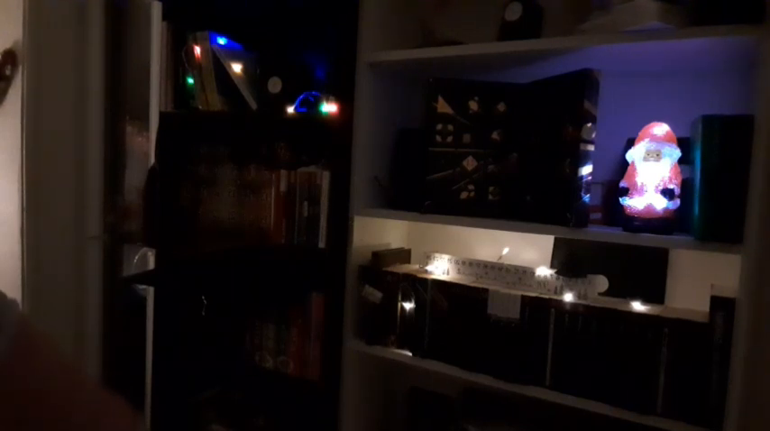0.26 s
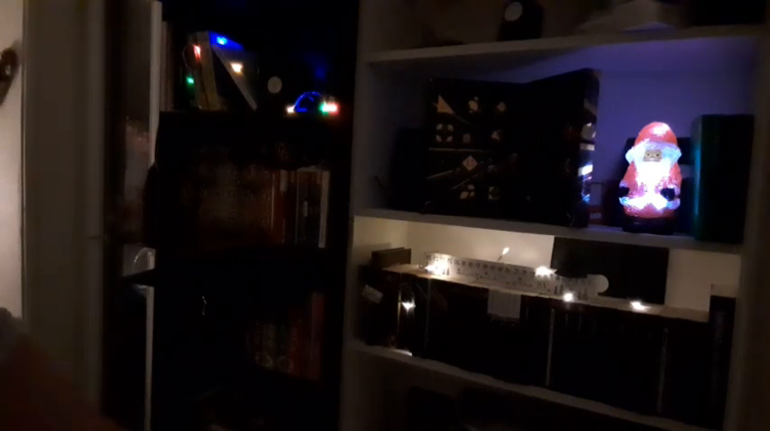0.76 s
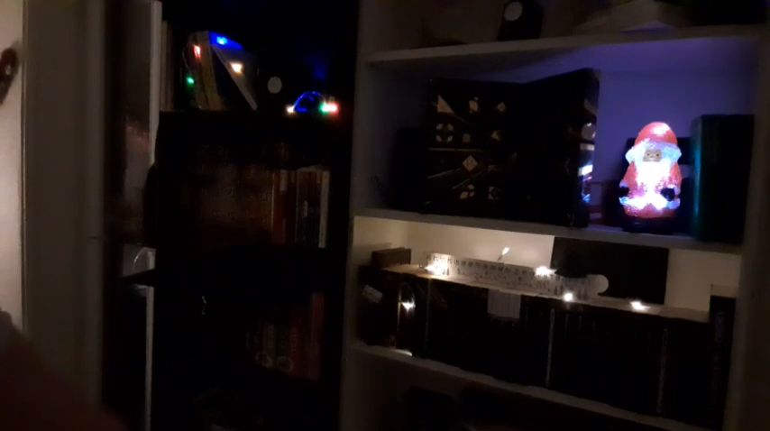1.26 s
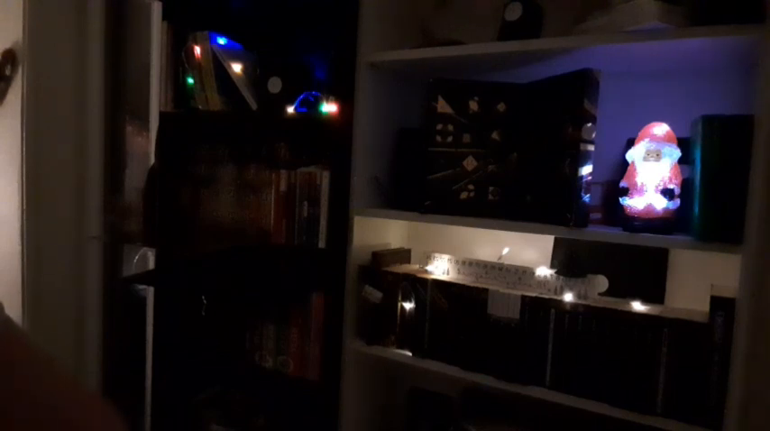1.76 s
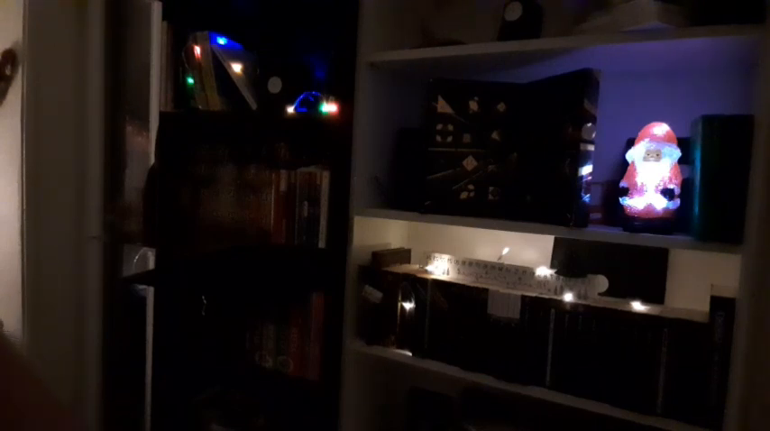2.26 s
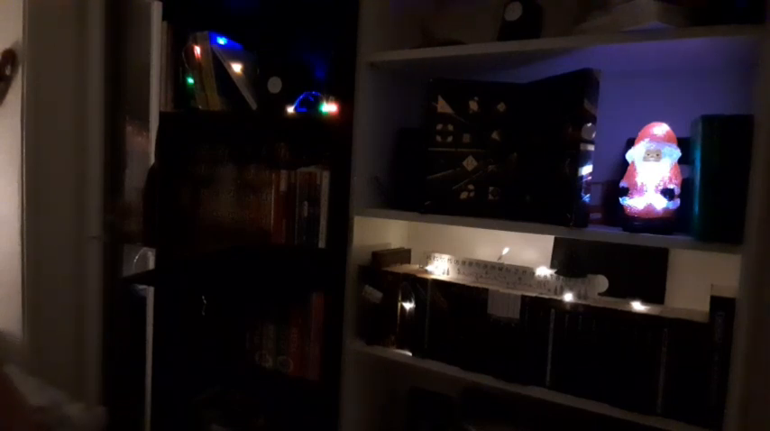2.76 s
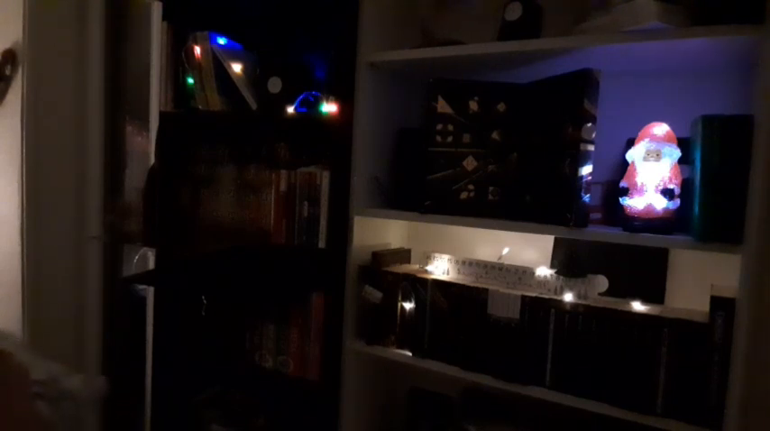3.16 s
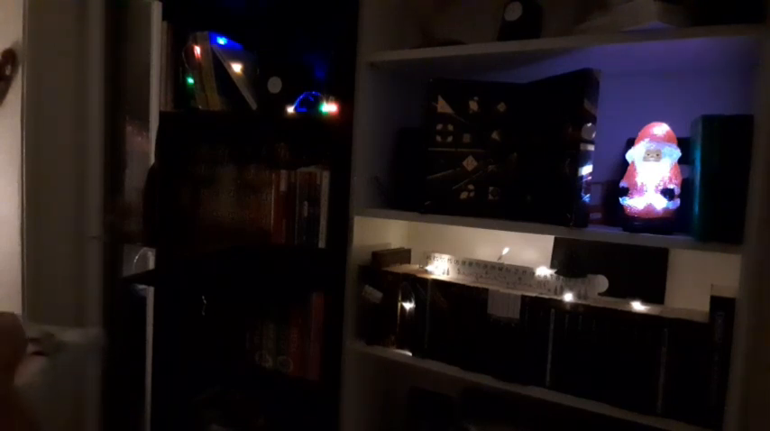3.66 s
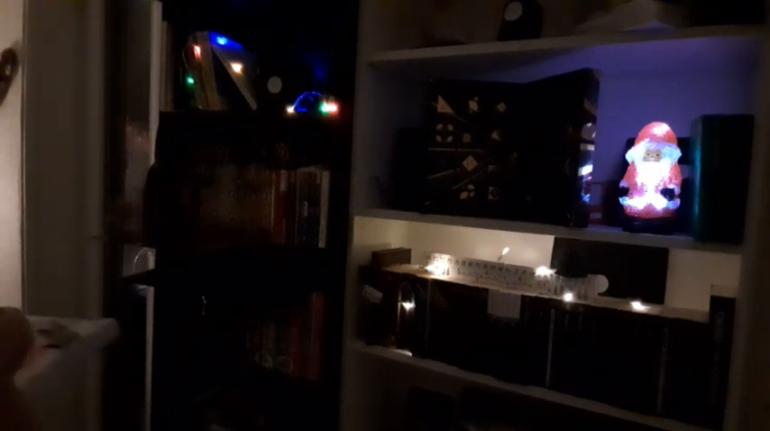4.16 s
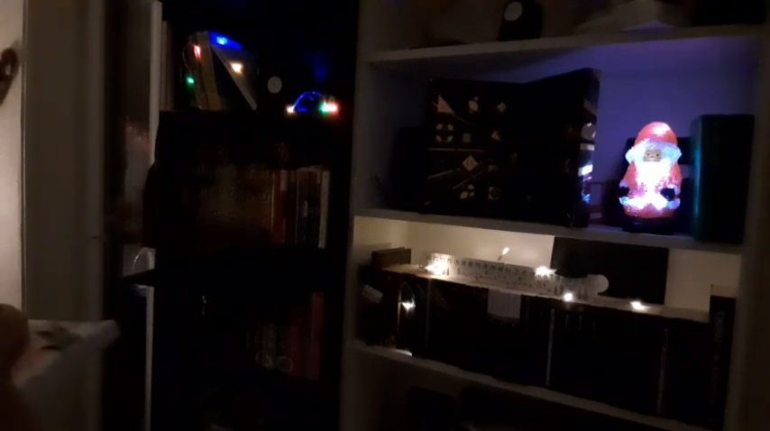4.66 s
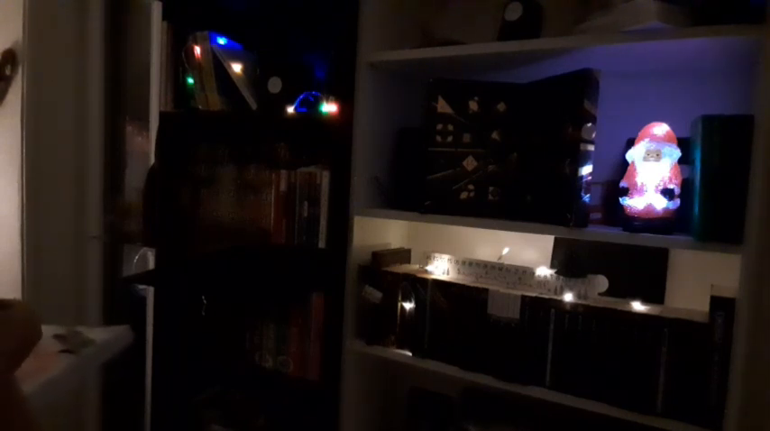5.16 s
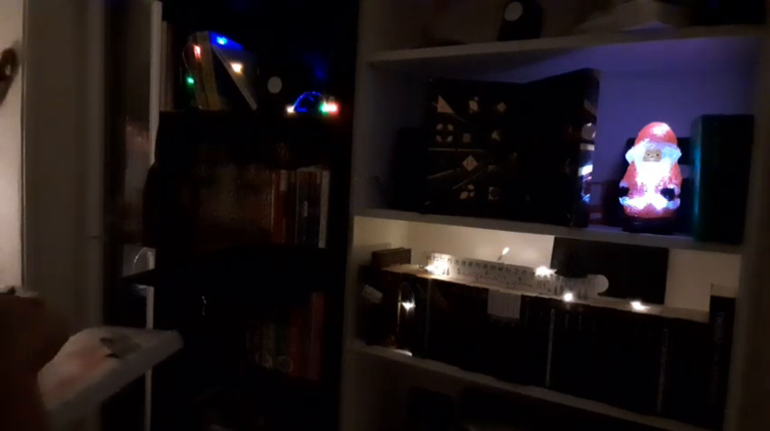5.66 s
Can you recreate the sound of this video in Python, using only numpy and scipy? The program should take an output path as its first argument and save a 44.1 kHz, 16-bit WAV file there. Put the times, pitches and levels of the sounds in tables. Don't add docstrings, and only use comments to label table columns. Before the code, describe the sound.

A quiet, fairly live room with faint air and microphone hiss. Close and slightly left, hands work a small package of stiff card and thin plastic film. From 0 to 0.65 s, strong, low, hollow card knocks come with a few crisp film snaps. Near silence follows until about 1.2 s, then faint ticks. From 1.6 to 2.3 s, quick crackling creases and light knocks gather. Between 2.4 and 2.75 s the seam tears in a loud, dense burst of sharp cracks, rips and rub. A pause follows, with one soft tick at 3.0 s. From 3.4 to 4.1 s, peeling gives brighter, closer, drier snaps and fine crackle, with a strong, bright snap at 4.0 s. From 4.3 to 5.3 s, sparse picking ticks and small card flicks continue, clearest near 4.7 and 5.1 s. It thins to faint ticks by 5.7 s. Short room reverberation follows each snap.

```python
import sys
import numpy as np
from scipy import signal
from scipy.fft import rfft, irfft
from scipy.io import wavfile

SR = 44100
rng = np.random.default_rng(int(sys.argv[2]) if len(sys.argv) > 2 else 0)


def rack_gain(trim_db):
    fader = np.asarray(trim_db, float)
    return 10 ** (fader / 20)


def pcm_store(signal):
    levels = np.round(np.clip(np.atleast_2d(signal), -1, 1) * 32767)
    wavfile.write(sys.argv[1], SR, levels.astype(np.int16).T)


N = 261513
BURST = 2048


def at_hz(points, hz):
    curve_hz, value = np.transpose(points)
    return np.interp(np.log(hz), np.log(curve_hz), value)


def band(x, low_hz, high_hz, order=2):
    edges_hz = [low_hz, min(high_hz, 0.45 * SR)]
    return signal.sosfilt(signal.butter(order, edges_hz, "band", fs=SR, output="sos"), x)


def resonance(x, hz, width_hz):
    r = np.exp(-np.pi * width_hz / SR)
    gain = (1 - r * r) / 2
    return signal.lfilter([gain, 0, -gain], [1, -2 * r * np.cos(2 * np.pi * hz / SR), r * r], x)


def rms_one(x):
    return x / np.sqrt(np.mean(x ** 2))


def energy_one(x):
    return x / np.sqrt(np.sum(x ** 2, axis=-1, keepdims=True))


# frequency in Hz, likeness from 0 (unrelated) to 1 (identical).
ROOM_LIKENESS = [(60, .5), (125, .97), (250, .95), (500, .35), (1200, 0), (16000, 0)]


def bands_of_noise(length):
    white = rng.standard_normal((2, 2, length))
    edges_hz = 25 * 2 ** np.arange(0, 9.6, 1 / 3)
    for k, (low_hz, high_hz) in enumerate(zip(edges_hz, edges_hz[1:])):
        mid, side = band(white[k % 2], low_hz, high_hz)
        centre_hz = np.sqrt(low_hz * high_hz)
        alike = np.clip(at_hz(ROOM_LIKENESS, centre_hz), 0, 1)
        opposed = np.sqrt(1 - alike) * side * [[1], [-1]]
        yield centre_hz, (np.sqrt(1 + alike) * mid + opposed) / np.sqrt(2)


# frequency in Hz, level in dB per Hz.
HUSH_COLOUR = [(15, -34), (25, -18.5), (74, -0.5), (238, -3), (313, -3.5), (1010, -13), (2210, -9),
               (3060, -8.5), (6730, -19), (9330, -24), (11300, -10), (15200, -3), (16500, -23)]


def hush():
    air = sum(rack_gain(at_hz(HUSH_COLOUR, hz)) * noise for hz, noise in bands_of_noise(N))
    level_db = -69.5
    return band(rack_gain(level_db) * rms_one(air), 55, 21000, order=1)


def grains(per_s, spread_db, pitches_hz, width):
    loudness_db = spread_db * np.minimum(rng.exponential(1, N), 4)
    sizes = rack_gain(loudness_db) * rng.choice([-1, 1], N)
    born = rng.random(N) < per_s / SR
    patch = rng.integers(0, len(pitches_hz), N)
    rung = np.zeros(N)
    for k, hz in enumerate(pitches_hz):
        slips = sizes * born * (patch == k) + 1e-18
        rung += resonance(slips, hz, width * hz)
    return rms_one(rung)


# time in seconds, effort in dB, card rub in dB relative to the film crackle.
FINGER_WORK = [(0.0, -75, 11.5), (0.28, -40, 3), (0.56, -60, 10), (0.639, -41, 7.5), (0.85, -81.5, -18),
               (1.22, -60, -3), (1.48, -56, -2), (1.63, -45, -2.5), (2.0, -55, 3), (2.26, -38.5, -13.5),
               (2.64, -27, -9), (2.86, -71, 19.5), (3.302, -59, -17), (3.6, -31.5, -21), (3.91, -39, -24),
               (4.2, -71, 0), (4.77, -43.5, -16), (5.93, -74, -1)]


def handling():
    s, effort_db, card_db = np.transpose(FINGER_WORK)
    t = np.arange(N) / SR
    film = grains(800., 4, np.geomspace(2200, 11000, 10), width=0.5)
    card = grains(700., 2.4, np.geomspace(350, 1500, 6), width=1.0)
    rub = rack_gain(np.interp(t, s, card_db) + 5.5) * card
    rustle = rack_gain(np.interp(t, s, effort_db) - 12.0) * (film + rub)
    direct_db = -0.5
    return np.array([rustle, rack_gain(direct_db) * rustle])


# time in seconds, direct path in dB, crease run in ms, beamed top in dB.
HOLDING_POSE = [
    (0, -8.5, 2.4, -8.5),
    (0.7, -10, 2.7, 0),
    (1.3, -9, 4.2, -7),
    (2.0, -10, 1.4, -1),
    (2.9, -15, 2.5, -9),
    (3.2, -6, 0.29, 7.5),
    (5.93, -4, 0.63, 10),
]


def pose(s):
    times, *columns = np.transpose(HOLDING_POSE)
    return [np.interp(s, times, column) for column in columns]


def burst(draws, length_ms, per_s):
    fade = np.exp(-1000 * np.arange(BURST) / SR / max(length_ms, 0.05))
    happens, size = draws[0] < per_s / SR, 2 * draws[1] - 1
    slips = 0.9 * happens * size * fade
    slips[0] = 1
    spectrum = rfft(slips)
    even = irfft(spectrum / np.abs(spectrum))
    return even * np.sqrt(np.sqrt(fade)) + 1e-18


def bursts(times, run_scale, per_s):
    draws = rng.random((len(times), 2, BURST))
    return np.array([burst(d, run_scale * pose(s)[1], per_s) for s, d in zip(times, draws)])


def add(out, s, sent, direct):
    i = round(s * SR)
    direct_db = pose(s)[0]
    out[:, i:i + BURST] += np.array([sent, rack_gain(direct_db) * direct])[:, :N - i]


# start in seconds, ring energy in dB, panel pitch in Hz, broad body in dB relative to the ring.
PANEL_BUCKLES = [(0.002, -22.5, 1108, -1), (0.085, 9.5, 1080, -2.5), (0.209, 12.5, 1110, -8),
                 (0.292, 9, 1060, -11), (0.452, 1.5, 1160, -1), (0.469, 1.5, 680, -1.5),
                 (0.615, 1.5, 700, 1), (0.62, -5.5, 384, 1.5), (1.068, -34.5, 410, -12),
                 (1.114, -35, 500, -22), (1.239, -26.5, 700, 3.5), (1.27, -20.5, 1180, 5.5),
                 (1.583, -27, 590, 9), (1.681, -17.5, 800, 6), (1.721, -39, 1000, 4),
                 (1.921, -17.5, 870, -18), (2.204, -11, 500, 0.5), (2.257, -7.5, 1780, 2),
                 (2.343, -12.5, 676, -9), (2.46, -42, 705, -8), (2.509, 5.5, 1140, -8),
                 (2.605, -11.5, 880, 10), (2.719, 1, 1226, 3.5), (2.75, -6.5, 760, -16),
                 (3, -35.5, 2040, 6), (3.381, -34, 1690, -14), (4.013, -11.5, 1210, -3),
                 (4.119, -5, 1310, -10), (4.422, -11, 1460, -16), (4.67, -29, 970, -2)]
# start in seconds, ring energy in dB, broad body in dB relative to the ring.
FLAP_FLICKS = [(1.615, -15.5, 7), (1.851, -9, -2.5), (1.973, -17.5, -5.5), (2.041, -21.5, 4.5),
               (3.311, -34.5, -5), (3.4255, -25, 1.5), (3.473, -24, -3), (3.518, -14, -1.5),
               (3.6184, -8.5, -11.5), (3.678, -16, -37), (3.718, -11.5, -11), (3.886, -17, -6.5),
               (3.951, -8, -9), (4.308, -21, -10), (4.365, -15, -12), (4.444, -11.5, -9.5), (4.67, -35, 3),
               (4.733, -31.5, 2), (4.9665, -13.5, -10.5), (5.028, -16, -9), (5.086, -3, -32),
               (5.225, -12.5, -11.5), (5.332, -33.5, 0), (5.686, -24.5, -24)]


def card_knocks():
    flap_hz, panel_thud_db, flap_thud_db = 2386, -7.5, -11.5
    thud_follows = 0.91
    knocks = [(*row, panel_thud_db) for row in PANEL_BUCKLES]
    knocks += [(s, db, flap_hz, body_db, flap_thud_db) for s, db, body_db in FLAP_FLICKS]
    slips = bursts([row[0] for row in knocks], run_scale=1.77, per_s=2900.)
    bodies = energy_one(band(slips, 460, 1690, order=4))
    deep = energy_one(band(slips, 50, 87))
    thuds = energy_one(band(slips, 230, 533)) + rack_gain(-31) * deep
    out = np.zeros((2, N))
    for (s, db, hz, body_db, thud_db), slip, body, thud in zip(knocks, slips, bodies, thuds):
        width_hz = min(0.92 * hz, 1100)
        ring = energy_one(resonance(resonance(slip, hz, width_hz), hz, width_hz))
        low = rack_gain(thud_db + thud_follows * body_db) * thud
        knock = rack_gain(db - 2.5) * (ring + rack_gain(body_db) * body + low)
        add(out, s, knock, rack_gain(4.0) * knock)
    return out


# start in seconds, ring energy in dB, ring pitch in Hz, crack in dB relative to the ring.
BENDING = [(0.0654, -45, 5500, -11), (0.087, 0.5, 4400, -1), (0.211, -15.5, 1880, 18),
           (0.2948, -10.5, 2600, -1.5), (0.4505, -3.5, 4800, 2), (0.469, -6, 6900, 7.5),
           (0.6152, -11, 4280, 15), (1.188, -34, 7200, -13), (1.261, -37.5, 5150, 16.5),
           (1.281, -18, 2390, -2.5), (1.298, -12.5, 4050, -9.5), (1.507, -32, 7060, 3),
           (1.587, -7.5, 7200, 2), (1.611, -6.5, 3250, 7), (1.64, -8, 4200, -3), (1.683, -5.5, 3550, 4.5),
           (1.719, -20, 3470, 15.5), (1.849, -2.5, 3300, -3), (1.887, -3, 3140, -8.5),
           (1.944, -20.5, 7000, 12.5), (1.973, -11, 5000, 2.5), (2.04, -5, 5120, -24),
           (2.06, 1.5, 7630, -7), (2.108, -10, 7060, 4), (2.259, -9.5, 6900, 2), (2.344, -50, 7290, 3)]
# start in seconds, ring energy in dB, ring pitch in Hz, crack in dB relative to the ring.
TEARING = [
    (2.434, 3.5, 3520, -6),
    (2.507, -17, 5120, 8),
    (2.512, -7.5, 4440, 10.5),
    (2.6018, 6.5, 2810, -3.5),
    (2.629, -13, 7000, 5),
    (2.719, -2.5, 6900, 9.5),
    (2.743, 1, 2340, -14),
    (3.003, -23.5, 2160, -37),
]
# start in seconds, ring energy in dB, ring pitch in Hz,
# crack in dB relative to the ring, facing the microphone in dB.
PEELING = [(3.221, -36.5, 4900, 10, -9), (3.313, -37, 7130, 9, -6), (3.3792, -21.5, 4740, -16, 7),
           (3.4252, -10.5, 2160, -10.5, -3), (3.4738, -15.5, 2220, -21, -7), (3.494, -4.5, 4740, -12, -1),
           (3.518, -10.5, 4000, -13, -3), (3.5544, -27.5, 7290, 19, -11), (3.5716, -10.5, 3670, 0, -13),
           (3.618, -5, 4230, -31, 9), (3.648, -26, 6480, 11, -15), (3.677, -12.5, 5870, 14, -7),
           (3.7163, -7, 4360, 2, -0.5), (3.7334, -11.5, 6480, 5.5, -20), (3.8512, -4.5, 8000, -22, -4),
           (3.8813, -1.5, 2160, 3.5, -5), (3.8838, -9.5, 5400, 6.5, -3), (3.9526, -5, 2450, 4.5, 9),
           (3.993, -3, 7290, -4, -2), (4.0132, 8, 7680, -7.5, 4.5), (4.1185, -11, 4760, 15.5, 1)]
# start in seconds, ring energy in dB,
# ring pitch in Hz, crack in dB relative to the ring, facing the microphone in dB.
PICKING = [(4.29, -22, 2250, 0, -10), (4.3067, -22.5, 6700, 12, 0.5), (4.3657, -22, 4570, 13, -3),
           (4.391, -19.5, 4440, -4.5, -9), (4.4222, -10.5, 4850, 4.5, 4), (4.4433, -15, 2430, 11.5, 0),
           (4.6346, -21, 7240, -10, 0), (4.6681, -16, 5200, 8, 4), (4.732, 0, 5430, -13.5, 6.5),
           (4.8268, -13, 7300, -17, 9), (4.838, -21.5, 5800, 9.5, 3), (4.875, -35, 5150, 6, 0),
           (4.9665, -21, 4550, 13.5, 4), (4.9824, -17.5, 3530, 11, -2.5), (5.0113, -16, 2770, 6, 3.5),
           (5.0296, -11, 4550, 1.5, -0.5), (5.0864, -5, 4340, 2.5, 0), (5.2238, -8.5, 4400, -15, -0.5),
           (5.3306, -9, 6250, 1.5, -3.5), (5.5763, -40, 2220, -10, -7), (5.6864, -22, 6410, -0.5, 0)]
TOP_BAND_HZ = (9300, 18000)


def film_snaps():
    top_db, top_follows = 4, 0.75
    beam_most_db = 2
    snaps = [(*row, 0) for row in BENDING + TEARING] + PEELING + PICKING
    slips = bursts([row[0] for row in snaps], run_scale=1, per_s=6000.)
    broads = energy_one(band(slips, 2260, 9460, order=4))
    tops = energy_one(band(slips, *TOP_BAND_HZ, order=3))
    out = np.zeros((2, N))
    for (s, db, hz, crack_db, facing_db), slip, broad, top in zip(snaps, slips, broads, tops):
        width_hz = 0.42 * hz
        ring = energy_one(resonance(resonance(slip, hz, width_hz), hz, width_hz))
        body = ring + rack_gain(crack_db) * broad
        top_crack = rack_gain(top_db + top_follows * crack_db) * top
        beamed = rack_gain(np.minimum(pose(s)[2], beam_most_db)) * top_crack
        level_db = db - 4.5
        add(out, s, rack_gain(level_db) * (body + top_crack), rack_gain(level_db + facing_db) * (body + beamed))
    return out


# frequency in Hz, time in seconds.
DECAY_TIME = [(100, 0.53), (500, 0.44), (2000, 0.5), (5000, 0.45), (9000, 0.36), (16000, 0.26)]
# frequency in Hz, tail energy in dB.
TAIL_ENERGY = [(100, 0.5), (500, 2.5), (2000, 1), (5000, 2.5), (9000, -1), (16000, -7.5)]
# delay in ms, spread in ms, energy in dB.
FURNITURE_ECHO = (6.9, 1.3, -11.5)


def echoes():
    t = np.arange(SR * 3 // 5) / SR
    at_ms, spread_ms, echo_db = FURNITURE_ECHO
    scatter = rack_gain(echo_db) * energy_one(np.exp(-((1000 * t - at_ms) / spread_ms) ** 2 / 2))
    onset = 1 - np.exp(-t / 0.00078)
    response = np.zeros((2, len(t)))
    for hz, noise in bands_of_noise(len(t)):
        t60 = at_hz(DECAY_TIME, hz)
        height = np.sqrt(2 * np.log(1000) / (t60 * SR))
        tail = height * rack_gain(-60 * t / t60) * onset
        shape = tail + scatter * min(hz / 2500, 1)
        response += rack_gain(at_hz(TAIL_ENERGY, hz)) * noise * shape
    return response * rack_gain([[0.7], [-0.7]])


# delay in ms, level in dB.
LEFT_ARRIVALS = [
    (0, 0),
    (2.2, -13),
]
# delay in ms, level in dB.
RIGHT_ARRIVALS = [
    (.3, -6),
    (1.8, -9),
]


def room(x, count=4):
    sent, direct = x
    turn = np.arange(N) * 4 // SR % count
    out = np.zeros((2, N))
    for k in range(count):
        part = (sent * (turn == k))[None]
        out += signal.fftconvolve(part, echoes(), axes=1)[:, :N]
    for side, paths in enumerate([LEFT_ARRIVALS, RIGHT_ARRIVALS]):
        for ms, db in paths:
            lag = max(round(ms * SR / 1000), 0)
            out[side, lag:] += rack_gain(db) * direct[:N - lag]
    return out


def scene():
    return hush() + room(handling() + card_knocks() + film_snaps())


def top_cut(x):
    return signal.sosfilt(signal.butter(12, 16970, fs=SR, output="sos"), x)


def record(dry):
    dip_depth, top_shelf_db = 0.72, -40
    ported = dry - dip_depth * resonance(dry, 9300, width_hz=2570)
    steep = signal.ellip(8, 0.5, 50, 15900, fs=SR, output="sos")
    cut = signal.sosfilt(steep, ported)
    return top_cut(cut + rack_gain(top_shelf_db) * ported)


dry = scene()
out = record(dry)
pcm_store(out)
```